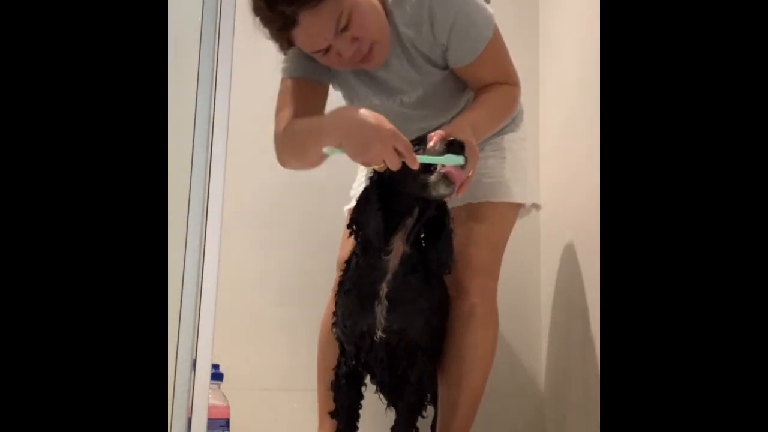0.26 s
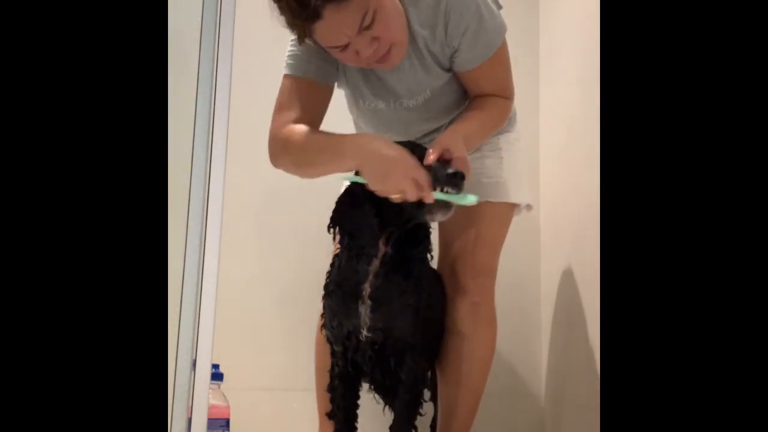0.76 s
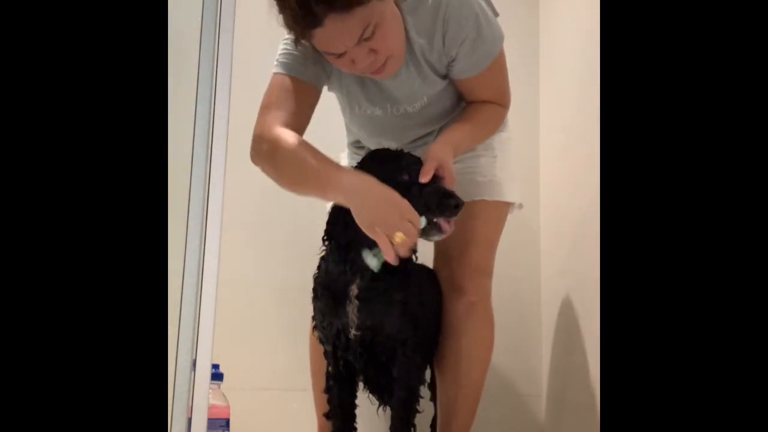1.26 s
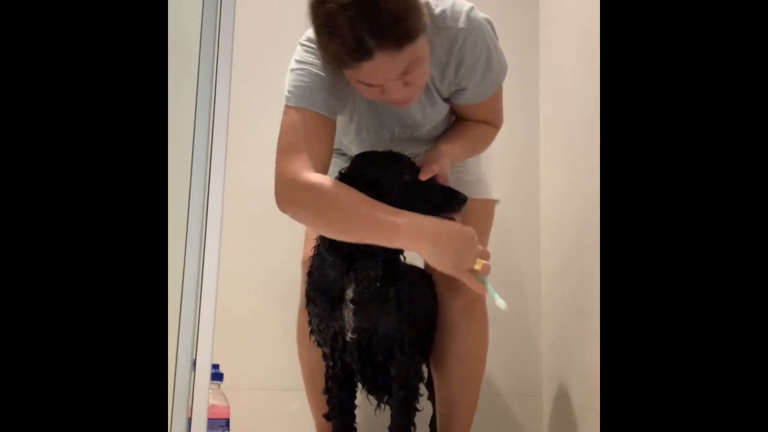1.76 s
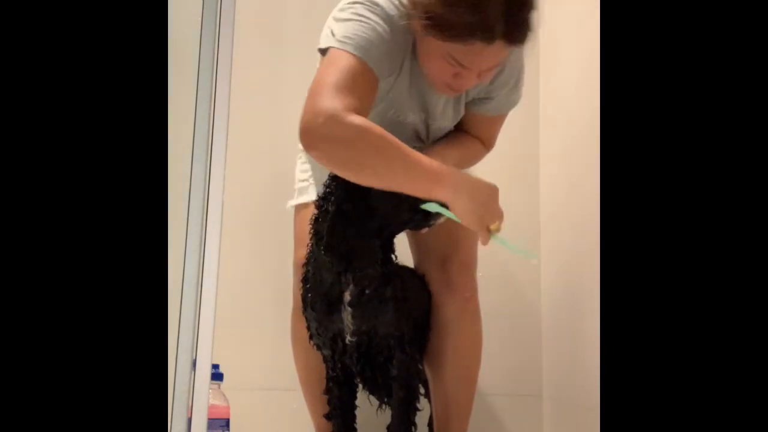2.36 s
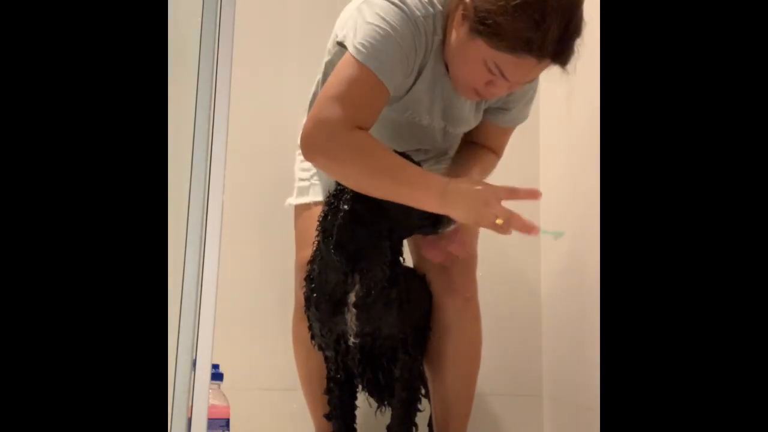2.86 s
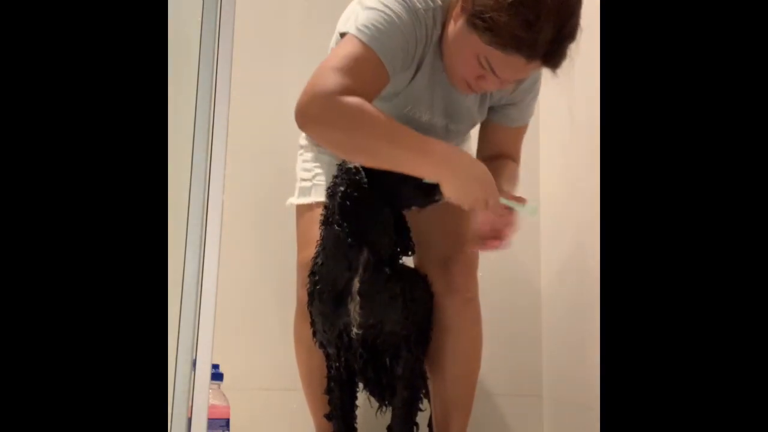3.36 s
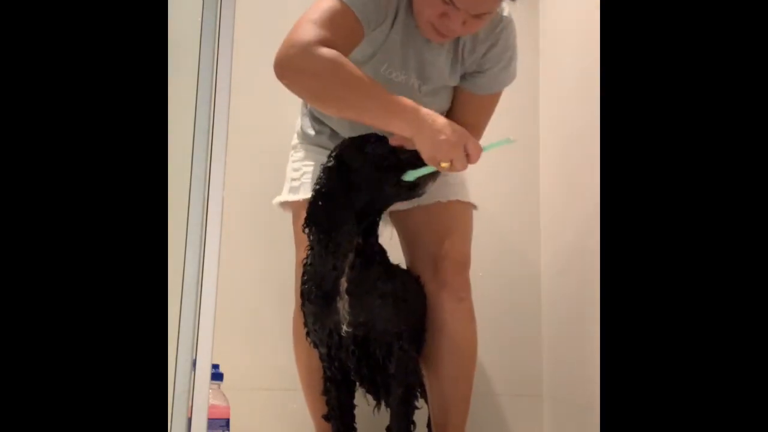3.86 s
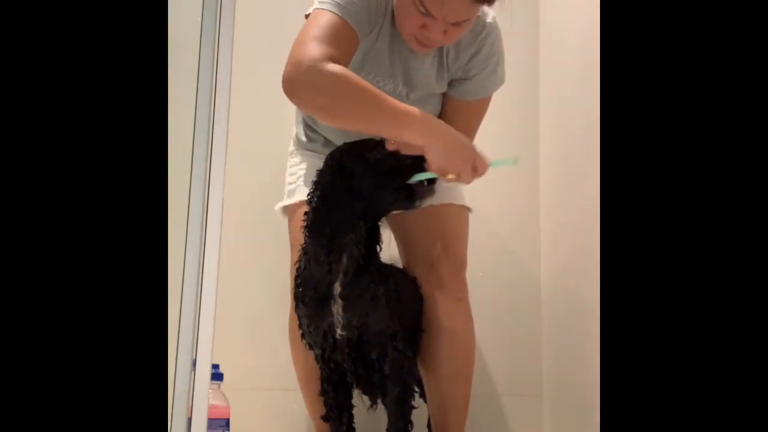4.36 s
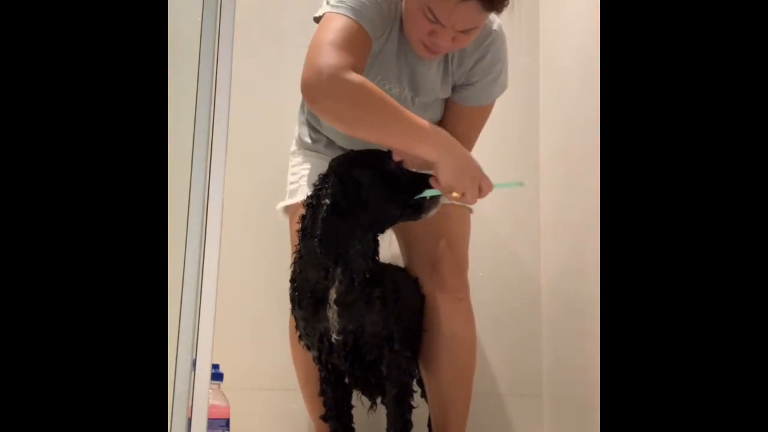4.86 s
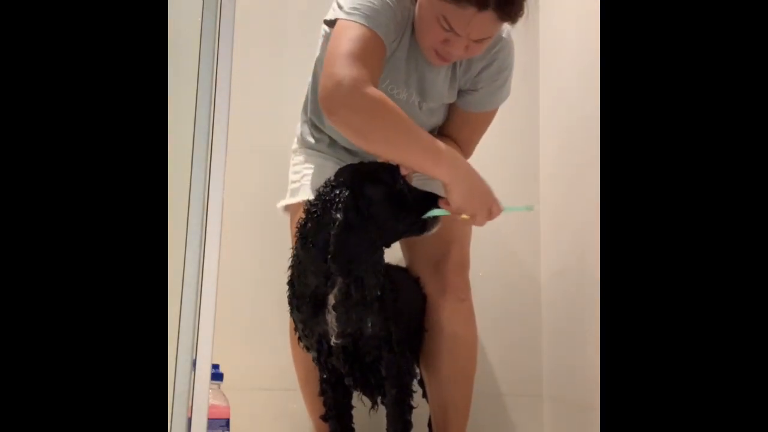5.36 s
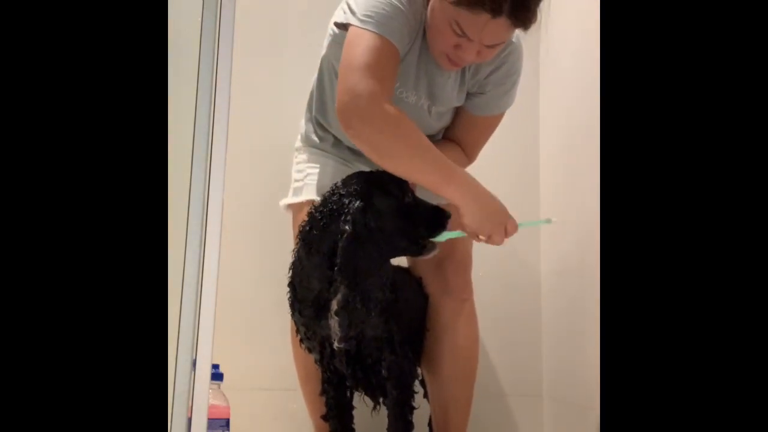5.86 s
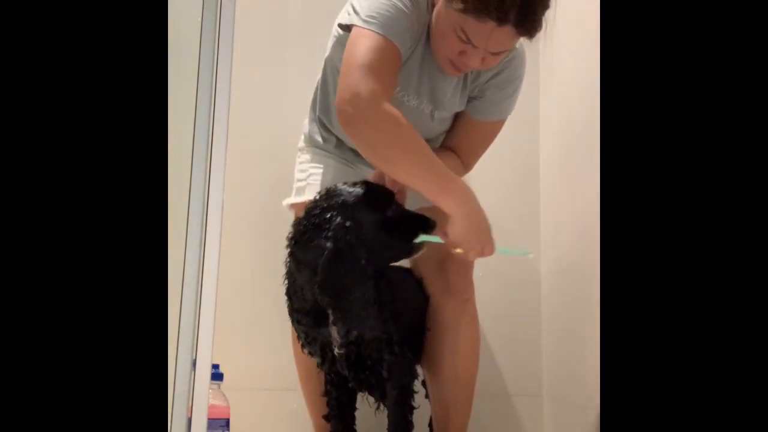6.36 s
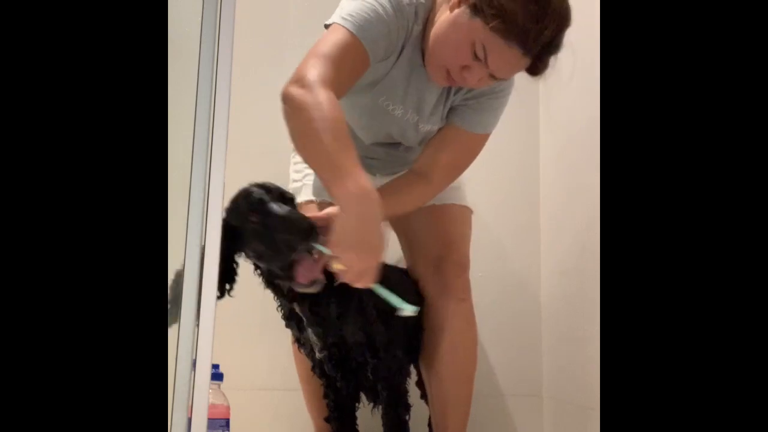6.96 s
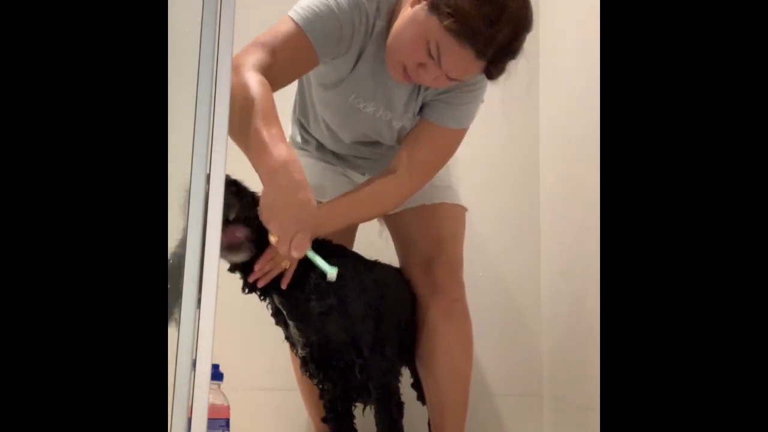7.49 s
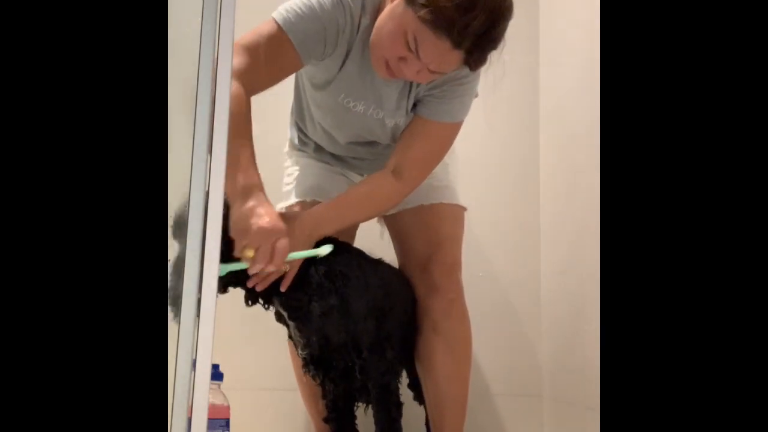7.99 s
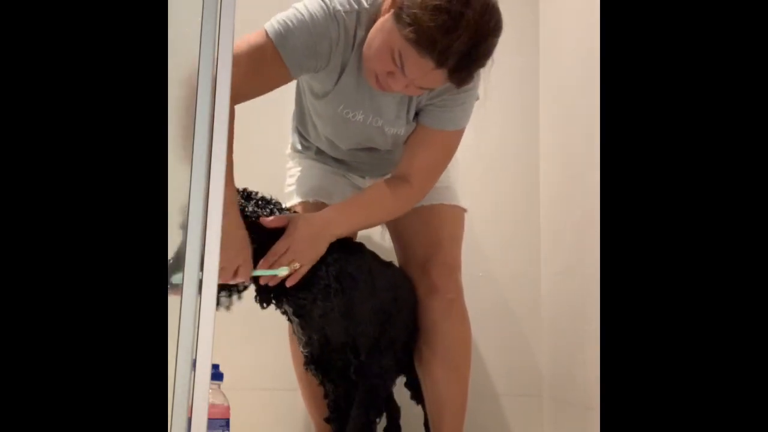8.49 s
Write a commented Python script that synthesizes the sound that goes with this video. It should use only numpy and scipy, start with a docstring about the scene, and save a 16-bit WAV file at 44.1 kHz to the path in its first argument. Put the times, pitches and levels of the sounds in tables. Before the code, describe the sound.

A wet dog's teeth are brushed: sticky mouth clicks, sucking notes and brief bristle rasps ring off hard walls above fan hum and fluttering hiss.

```python
"""A wet hiss swells and fades unevenly over a fan's steady hum: a wet dog has its teeth brushed
in a tiled shower stall. Noise makes the hiss, the hum, the rushing air and the deep rumble.
Soon lips and tongue smack, pop and suck: snaps and gliding notes ring the mouth, then the hard walls.
Bristles rasp in bursts of ticks; later, weight shifts on the floor with soft thuds of resonant noise."""
import sys
import numpy as np
from scipy import signal
from scipy.fft import rfft, irfft, next_fast_len
from scipy.io import wavfile
from scipy.ndimage import uniform_filter1d, map_coordinates

SR = 44100
rng = np.random.default_rng(int(sys.argv[2]) if len(sys.argv) > 2 else 0)


def wrap_up_sound(samples):
    """Save the sound to the file named by the first command line argument, as 16-bit audio."""
    columns = np.atleast_2d(samples).T
    # keep every value between -1 and 1, then stretch to whole-number steps
    tamed = np.clip(columns, -1, 1)
    steps = np.round(tamed * 32767).astype(np.int16)
    wavfile.write(sys.argv[1], SR, steps)


N = 384993

# one long squealing suck, point by point: (time_s, pitch_hz, level_db before the echo)
SQUEAL_PATH = [(.725, 1229, -57), (.748, 1219, -51), (.778, 1189, -43), (.80, 1139, -58), (.835, 1066, -46),
               (.88, 1103, -48), (.91, 1121, -58), (.945, 1111, -47.5), (.97, 1127, -58), (.99, 1199, -42),
               (1.016, 1250, -50), (1.035, 1270, -72)]


def amp(db):
    """Turn decibels into a gain."""
    return 10 ** (np.asarray(db) / 20)


def unit(x):
    """Scale to an rms (average strength) of 1."""
    return x / np.sqrt(np.mean(x ** 2) + 1e-20)


def along(points, hz):
    """Read (frequency_hz, value) points at any frequency, on a log axis."""
    f, v = np.transpose(points)
    return np.interp(np.log(hz + 1), np.log(f + 1), v)


def curve(rows):
    """Turn (time_s, value) rows into one value per sample."""
    return np.interp(np.arange(N) / SR, *np.transpose(rows))


def wobble(rate):
    """A smooth random curve with this many knots a second."""
    knots = rng.standard_normal(int(N * rate / SR) + 4)
    return map_coordinates(knots, [np.arange(N) * rate / SR])


def add(out, s, sound):
    """Mix a short sound in at time s."""
    out[:, round(s * SR):][:, :sound.shape[-1]] += sound


def filtered(x, response):
    """Multiply the spectrum of x by a complex response, a function of frequency."""
    n = x.shape[-1]
    m = next_fast_len(n + 4096)  # spare room for the filter's ringing
    return irfft(rfft(x, m) * response(np.fft.rfftfreq(m, 1 / SR)), m)[..., :n]


def resonance(f, hz, width):
    """How one damped resonance answers each frequency: strongest at hz, ringing longer if narrow."""
    return 1j * f * width / (hz * hz - f * f + 1j * f * width)


def spread(pair, colour):
    """Two unrelated signals become a coloured left and right, as alike as a diffuse field at the ports."""
    # left-right likeness: (frequency_hz, correlation from 0 to 1)
    likeness = [(120, 1), (300, 0.91), (600, 0.41), (1000, 0.13), (1800, 0.61), (2700, 0.12), (4000, 0.94),
                (6500, 1), (7900, 1), (9200, 1), (13000, 0.87)]

    def response(f):
        turn = np.arccos(np.clip(along(likeness, f), -1, 1)) / 2
        return colour(f) * np.array([np.cos(turn), np.sin(turn)])

    mid, side = filtered(pair, response)
    return unit(np.array([mid + side, mid - side]))


def rush(spectrum):
    """Stereo noise of rms 1 with the given spectrum."""
    return spread(rng.standard_normal((2, N)), lambda f: amp(along(spectrum, f)))


def hiss_swells():
    """Level of the treble hiss: each swell rises, sags and fades."""
    # hiss swells: (start_s, length_s, level_db before the shifts made in wet_hiss)
    swell_rows = [ (0, 0.069, -57.5), (0.133, 0.086, -55.5), (0.258, 0.13, -57), (0.398, 0.087, -57.5),
                  (0.532, 0.094, -54), (0.71, 0.044, -53), (0.848, 0.073, -51.5), (0.98, 0.06, -57.5),
                  (1.103, .11, -54.5), (1.652, 0.068, -60), (1.859, 0.061, -58), (2.109, 0.36, -60.5),
                  (2.523, 0.096, -63.5), (2.656, 0.049, -60), (2.762, .17, -60.5), (3.074, 0.053, -55.5),
                  (3.215, 0.08, -60), (3.326, .13, -63.5), (3.551, 0.13, -60), (3.747, .06, -62),
                  (3.848, 0.16, -65.5), (4.01, 0.18, -60.5), (4.286, 0.05, -58), (4.404, .06, -59),
                  (4.51, 0.055, -55.5), (4.648, 0.061, -56), (4.844, 0.032, -57), (4.932, 0.17, -56.5),
                  (5.185, 0.15, -58), (5.455, 0.31, -63.5), (5.748, 0.16, -59), (5.97, 0.26, -63.5),
                  (6.3, 0.042, -55.5), (6.472, 0.17, -60), (6.633, 0.24, -58.5), (6.87, 0.26, -64.5),
                  (7.126, 0.042, -57.5), (7.405, 0.12, -58.5), (7.56, 0.16, -59), (7.798, 0.082, -60.5),
                  (7.992, .16, -58), (8.213, 0.17, -64), (8.53, 0.17, -59)]
    rise_s, sag_db, fade_t60_s = 0.026, 2, 0.42  # fade: time to fall by 60 dB
    quiet_db = -73.5  # quiet level of the hiss between swells, before the same shifts
    t = np.arange(N) / SR
    power = np.full(N, amp(quiet_db) ** 2)
    for start, length, db in swell_rows:
        near = slice(round(start * SR), round((start + length + fade_t60_s) * SR))
        age = t[near] - start
        sag = sag_db * np.minimum(age / length, 1)
        fade = 60 * np.maximum(age - length, 0) / fade_t60_s
        rise = np.clip(age / rise_s, 0, 1)
        power[near] += (rise * amp(db - sag - fade)) ** 2
    return np.sqrt(power)


def wet_hiss(flicks_per_s=1300, smear=0.31, level_db=2, flutter_db=1.8, uneven_db=1):
    """Tiny random flicks mixed with smooth noise make a wet treble hiss that swells and flickers."""
    # colour of the hiss: (frequency_hz, relative level_db per Hz)
    hiss_colour = [(500, -34), (1900, -5.5), (2700, -8.5), (4000, -4.5), (5000, -3), (6300, 0),
                   (7500, -6.5), (9000, -16.5), (11000, 1), (13000, -6.5), (15500, -6)]
    flicks = (rng.random((2, N)) < flicks_per_s / SR) * rng.standard_normal((2, N))
    smeared = flicks + smear * rng.standard_normal((2, N))
    hiss = spread(smeared, lambda f: amp(along(hiss_colour, f)))
    flutter = flutter_db * wobble(130)  # fast flutter of the hiss
    unevenness = uneven_db * wobble(28)  # slower unevenness of the hiss
    return hiss_swells() * amp(flutter + unevenness + level_db) * hiss


def fan(hum_db=-55, air_db=-55, rumble_db=0, waver_db=1):
    """The fan's noise booms in the low modes of the stall, over rushing air and a deep, wavering rumble."""
    # stall modes that the fan drives: (pitch_hz, width_hz before squaring, relative level_db)
    hum_modes = [(59, 8, 3), (99.34, 4.8, 2), (137.8, 5.2, -1), (177.5, 6.8, -2.5), (238.7, 11.2, -9.5),
                 (283.8, 11.7, -15)]
    # colours of the rushing air and the rumble: (frequency_hz, relative level_db per Hz)
    air_colour = [(60, -4), (130, -0.5), (300, -4.5), (450, -10), (750, -11.5), (1200, -19.5),
                  (1530, -15.5), (1850, -27), (2500, -26.5), (3200, -24.5), (3900, -20), (4700, -24),
                  (6300, -19), (11500, -50.5)]
    deep_colour = [(10, -13), (22, 2.5), (30, -1.5), (42, -9.5), (56, -7), (75, -3.5), (90, -12.5),
                   (130, -30), (300, -59)]
    # course of the rumble: (time_s, level_db before wavering)
    rumble_levels = [(0, -54), (1.3, -56), (1.63, -49), (2.15, -52.5), (2.53, -51.5), (2.84, -52),
                     (3.5, -57), (4.0, -50), (4.3, -55), (8.2, -58), (8.73, -49)]

    def modes(f):
        return sum(amp(db) * np.abs(resonance(f, hz, width)) ** 2 for hz, width, db in hum_modes)

    hum = spread(rng.standard_normal((2, N)), modes)
    rumble_level = amp(curve(rumble_levels) + rumble_db + waver_db * wobble(4))
    rumble = rumble_level * rush(deep_colour)
    return amp(hum_db) * hum + amp(air_db) * rush(air_colour) + rumble


def stall(x, wet_db, build):
    """A short sound and the dense echo of the tiled walls, which builds up over about build seconds."""
    # how long the tiles ring: (frequency_hz, time to fall by 60 dB in s)
    ring_times = [(300, 0.46), (750, .44), (1200, 0.37), (2200, 0.4), (6000, 0.33), (14000, 0.09)]
    # colour of the echo: (frequency_hz, relative level_db)
    wall_colour = [(300, 4), (1200, 0.5), (2000, -2), (3200, -2), (5000, -2), (12000, 1)]
    hz, t, z = signal.stft(rng.standard_normal((2, SR // 2)), SR, nperseg=256)
    fade = amp(-60 * t / along(ring_times, hz)[:, None])  # each pitch dies at its own speed
    tail = signal.istft(z * fade, SR, nperseg=256)[1]
    tail = tail * (1 - np.exp(-(np.arange(tail.shape[1]) / SR / build) ** 2))
    echo = spread(tail, lambda f: amp(along(wall_colour, f)))
    answer = amp(wet_db) * echo / np.sqrt(tail.shape[1])
    answer[:, 0] += 1  # the direct sound
    return signal.fftconvolve(x[None], answer, axes=1)


def rasp(seconds, hz, octaves, catches_per_s=1100, cycles=4.3, size_db=3.0):
    """Tufts catch and slip at random moments, each ticking at its own pitch; rms 1 over the given seconds."""
    count = int(np.ceil(max(catches_per_s * seconds, 4)))
    when, pitch, size = rng.random(count), rng.standard_normal(count), rng.exponential(size=count)
    turns = hz * 2 ** (octaves * pitch[:, None]) * np.arange(SR // 100) / SR  # cycles so far
    ticks = amp(size_db * size)[:, None] * np.sin(2 * np.pi * turns) * np.exp(-2 * turns / cycles)
    # overlapping ticks add up, sample by sample
    at = (when * seconds * SR).astype(int)[:, None] + np.arange(ticks.shape[1])
    out = np.bincount(at.ravel(), ticks.ravel())
    return out * np.sqrt(seconds * SR / np.sum(out ** 2))


def peel(t, seconds, snaps_per_s, follow=0.7, rise_s=.0006):
    """A saliva film breaks: after a first snap a crowd of snaps builds and fades while the surfaces part."""
    snaps = follow * (rng.random(len(t)) < snaps_per_s / SR) * rng.standard_normal(len(t))
    crowd = snaps * (1 - np.exp(-t / rise_s))
    return np.where(t == 0, .5, crowd) * np.exp(-t / seconds)


def smack(click_hz, click_width_hz, second_hz, second_db, slap_db, spit_db, seconds,
          second_width_hz=450, skirt=1.44, throat_hz=780, throat_width_hz=260, throat_db=-5,
          slap_hz=1500, slap_width_hz=2800, spit_hz=5400, spit_width_hz=7500):
    """The snaps ring the small gaps around tongue and teeth, slap the flesh and throw spit."""
    t = np.arange(SR // 12) / SR
    snaps = peel(t, seconds, snaps_per_s=7000)

    def ring(hz, width):
        # a second, broad resonance trims the skirts; total energy 1
        rung = filtered(snaps, lambda f: resonance(f, hz, width) * resonance(f, hz, skirt * hz))
        return unit(rung) / np.sqrt(len(t))

    click = ring(click_hz, click_width_hz) + amp(second_db) * ring(second_hz, second_width_hz)
    # soft flesh meets with a broad thud that reaches down into the throat
    slap = ring(slap_hz, slap_width_hz) - amp(throat_db) * ring(throat_hz, throat_width_hz)
    spit = amp(spit_db) * ring(spit_hz, spit_width_hz)
    return spit - click - amp(slap_db) * slap


def squeak(hz):
    """Air drawn past wet lips sounds the mouth cavity: a gliding note that flutters with the saliva."""
    rough = .35  # share of flutter
    flutter = unit(uniform_filter1d(rng.standard_normal((2, len(hz))), size=140, axis=1))
    phase = 2 * np.pi * np.cumsum(hz) / SR
    return unit((1 + rough * flutter[0]) * np.sin(phase) + rough * flutter[1] * np.cos(phase))


def squeal():
    """One long suck around the brush: its note dips and rises again."""
    s, hz, db = np.transpose(SQUEAL_PATH)
    t = s[0] + np.arange(SR // 2) / SR
    level = (t < s[-1]) * amp(np.interp(t, s, db))
    return level * squeak(np.interp(t, s, hz))


def pop(hz, life_s=.0013, rise_s=0.00072, fall=.2):
    """A pocket between lip and gum opens: a few cycles whose pitch falls onto hz; peak about 1."""
    t = np.arange(SR // 50) / SR
    fade = np.exp(-t / life_s)
    swell = (1 - np.exp(-(t / rise_s) ** 2)) * fade
    phase = 2 * np.pi * np.cumsum(hz * (1 + fall * fade)) / SR
    return np.sin(phase) * swell / swell.max()


def suck(start_hz, end_hz, seconds, skew=0.71):
    """A short note that swells fast and glides as the cavity changes size; total energy 1."""
    u = np.minimum(np.arange(SR // 12) / SR / seconds, 1)  # 0 to 1 along the note
    swell = np.sin(np.pi * u ** skew)
    note = swell * squeak(start_hz + (end_hz - start_hz) * u)
    return unit(note) / np.sqrt(len(u))


def mouth(smack_db=13, suck_db=17.5, count=16, faint_db=-57):
    """Rasps, smacks, pops and hollow sucks ring the stall; faint saliva ticks fall at random between them."""
    # bristles rasp over teeth and lips, level before the echo:
    # (start_s, length_s, level_db, centre_hz, pitch_spread in octaves)
    rasp_rows = [(.15, .04, -64.5, 2000, .1), (0.727, 0.029, -48.5, 2750, .28),
                 (.832, 0.064, -48.5, 2100, 0.28), (.978, .035, -49, 1850, 0.32),
                 (1.152, .02, -48.5, 2420, 0.42), (1.891, .04, -70, 3500, 0.46),
                 (2.201, .03, -55, 1400, .55), (3.269, .07, -72, 1800, .6), (3.571, .1, -67.5, 1010, .6),
                 (4.166, .025, -52, 1500, .7), (4.31, .025, -56, 1400, .7), (4.88, .03, -60, 1580, .5),
                 (4.985, .02, -55, 2200, .45), (5.747, .012, -55, 3100, .2), (5.763, .045, -46, 1900, .65),
                 (8.051, .02, -57, 3400, .35), (8.475, .06, -50, 1450, .35)]
    # wet smacks of lips and tongue; smack_db is added to click_db, the last three levels are over the click:
    # (start_s, click_db, click_hz, click_width_hz, second_mode_hz, second_mode_db,
    #  flesh_slap_db, spit_db, fade_s)
    smack_rows = [ (0.694, -43, 2000, 450, 3000, 1, -0.5, -1, 0.0014),
                  (0.725, -39.5, 1950, 400, 3350, 5, -4, -6, 0.002),
                  (0.738, -36, 3520, 350, 2960, 3, -11, -13, 0.0026),
                  (0.8292, -36.5, 1950, 700, 2880, -1, 1, -16, .003),
                  (0.844, -42.5, 1750, 400, 2730, 1, 8, -15, 0.0041),
                  (0.878, -38.5, 1950, 450, 2660, -7, -7, -25, 0.0033),
                  (0.897, -49, 1950, 400, 2700, -11, -8, -16, .002),
                  (0.974, -38.5, 2120, 600, 1510, -4.5, -10, -35, 0.0025),
                  (1.143, -51, 2000, 400, 2930, -3, -6, 0, .003),
                  (1.147, -35, 1930, 250, 2925, 2, -13, 5.5, 0.0021),
                  (1.149, -35, 2280, 300, 3760, -11, -7, 2, 0.0021),
                  (2.17, -53.5, 2400, 400, 3300, -9, 10.5, 7, 0.0025),
                  (2.199, -37.5, 2460, 320, 1790, -5, -1.5, -25, 0.0011),
                  (2.917, -50.5, 2800, 220, 1900, -7, 0, -12, 0.0017),
                  (2.948, -55, 2550, 300, 3600, 4, -2, -6, .002),
                  (3.253, -58, 1550, 400, 4400, -2, -7, -1, 0.0013),
                  (3.588, -53, 3320, 500, 3940, 2, -9, -9, .008),
                  (3.948, -49.5, 3280, 180, 2120, -3, -12, -16, 0.0036),
                  (4.163, -41, 2110, 550, 2950, -2, -1, -24, 0.0009),
                  (4.306, -43, 2160, 500, 3000, -9, -1, -11, .0009),
                  (4.874, -50, 3000, 600, 1800, 0, 6.5, -13, 0.0036),
                  (4.9804, -36, 2170, 500, 3070, -6, -9, -6, .0013),
                  (5.0863, -51, 2000, 500, 2800, -6, -2, -6, .002),
                  (5.089, -35.5, 2060, 300, 2820, -16, -12, -6, 0.0014),
                  (5.321, -47, 3340, 700, 5500, -2, -3, 1, .008),
                  (5.7605, -37, 2450, 700, 3220, -8, -8, 0, 0.0033),
                  (5.780, -35, 4240, 550, 2900, -8, 1.5, -9, 0.0073),
                  (6.491, -47, 2020, 400, 1480, 1, -5, 10, 0.026),
                  (6.575, -41, 2600, 250, 2020, -1, -7, -16, 0.0018),
                  (6.633, -36.5, 2010, 220, 3000, -0.5, -16, -7, 0.00059),
                  (7.179, -56, 2080, 320, 3050, -8, 4, 8, 0.0072),
                  (8.05, -50, 2580, 1200, 3530, -11, 2, 15, 0.00059),
                  (8.456, -44, 1660, 400, 1150, -1, -14, -20, 0.01),
                  (8.473, -38, 1720, 280, 1160, -4, -14, -30, .015),
                  (8.523, -49.5, 1800, 700, 2600, -8, -1, -12, 0.01),
                  (8.658, -53, 2870, 600, 4250, -3, -5, 3, 0.013)]
    # sharp pops as the lips come unstuck: (start_s, peak_db before the echo, pitch_hz)
    pop_rows = [(.7255, -33, 3250), (.7395, -32.5, 3400), (.8315, -33.5, 2950), (.9762, -33.5, 2250),
                (1.1475, -32, 2065), (2.1992, -32.5, 2510), (2.917, -46, 2750), (4.163, -30.5, 2030),
                (4.3067, -35.5, 2130), (4.981, -32, 3000), (4.9822, -32, 2150), (5.0893, -32, 2000),
                (5.761, -32.5, 2420), (6.6312, -31, 1950)]
    # hollow sucks; suck_db is added to the level: (start_s, level_db, start_hz, end_hz, length_s)
    suck_rows = [ (0.842, -41, 760, 660, 0.027), (1.15, -49, 766, 716, 0.012),
                 (1.884, -48.5, 778, 740, .03), (2.199, -45, 785, 740, 0.012),
                 (2.425, -50.5, 1190, 1230, .012), (2.429, -51, 755, 720, .02), (2.92, -53, 1020, 940, .03),
                 (4.161, -45, 780, 740, .01), (4.309, -43, 1147, 974, 0.023), (4.44, -52, 1080, 1030, .02),
                 (4.878, -41, 1047, 1133, 0.032), (4.994, -38.5, 1066, 1170, 0.035),
                 (5.088, -32.5, 1228, 1370, 0.03), (5.763, -31.5, 1289, 1128, 0.035),
                 (5.777, -43, 760, 706, 0.019), (6.554, -46.5, 1025, 955, 0.013),
                 (6.63, -37, 807, 710, 0.024), (7.63, -52.5, 1130, 1170, .03),
                 (8.457, -36, 715, 747, 0.024), (8.47, -37.5, 1742, 1690, 0.04),
                 (8.478, -42, 1140, 1100, .02), (8.482, -41.5, 742, 702, .035),
                 (8.529, -40, 744, 730, 0.039)]
    out = np.zeros((2, N + SR))
    for s, seconds, db, *colour in rasp_rows:
        add(out, s, stall(amp(db) * rasp(seconds, *colour), wet_db=-1.5, build=0.0033))
    for s, db, *shape in smack_rows:
        add(out, s, stall(amp(smack_db + db) * smack(*shape), wet_db=2.5, build=0.003))
    for s, db, hz in pop_rows:  # aimed at the microphone, so the walls get less
        add(out, s, stall(amp(db) * pop(hz), wet_db=-10, build=0.004))
    notes = [(s, amp(suck_db + db) * suck(*glide)) for s, db, *glide in suck_rows]
    notes.append((SQUEAL_PATH[0][0], squeal()))
    for s, note in notes:
        add(out, s, stall(note, wet_db=-1.0, build=0.0044))
    for when, size, jaw in rng.random((count, 3)):
        level = amp(smack_db + faint_db + 9.1 * (size - .5))
        # a higher jaw value raises both modes
        tick = level * smack(1900 + 1600 * jaw, 300, 700 + 700 * jaw, -8, -7, 0, .0022)
        add(out, when * N / SR, stall(tick, wet_db=2.5, build=0.0041))
    return out[:, :N]


def bumps(floor_hz=66, width_hz=45, swell_s=0.028):
    """Shifting weight thuds softly into the floor: noise rings a low resonance, swells and dies away."""
    # dull bumps on the shower floor: (start_s, level_db at the top of the swell)
    bump_rows = [(1.585, -45), (2.31, -54), (2.505, -50), (2.61, -53), (7.72, -52)]
    out = np.zeros((2, N + SR))
    t = np.arange(SR // 3) / SR
    swell = t / swell_s * np.exp(1 - t / swell_s)
    for s, db in bump_rows:
        noise = rng.standard_normal(len(t))
        boom = unit(filtered(noise, lambda f: resonance(f, floor_hz, width_hz) ** 2))
        add(out, s, amp(db) * boom * swell)
    return out[:, :N]


def scene():
    """Hiss, fan, mouth and floor together."""
    return wet_hiss() + fan() + mouth() + bumps()


def record(dry, port_hz=8200, port_width_hz=350, port_gain=4.1):
    """The phone's two ports ring slightly and differ in phase and level; nothing passes above its band limit."""
    # how far left leads right: (frequency_hz, lead in radians)
    left_lead = [(400, 0), (800, 0.24), (1400, -0.5), (2400, 0.73), (3500, 1.5), (6000, 2), (7800, 3),
                 (10000, 3.5), (13000, 4.5), (15800, 8)]
    # left level minus right level: (frequency_hz, difference_db)
    left_lean = [(70, 0), (150, -1.5), (1200, -1.1), (2500, -0.28)]
    top_hz = 15800
    sides = np.array([[.5], [-.5]])  # each side takes half of the difference

    def response(f):
        ports = np.exp(1j * sides * along(left_lead, f)) * amp(sides * along(left_lean, f))
        ringing = 1 + port_gain * resonance(f, port_hz, port_width_hz)
        return ports * ringing * (f < top_hz)

    return filtered(dry, response)


dry = scene()
out = record(dry)
wrap_up_sound(out)
```